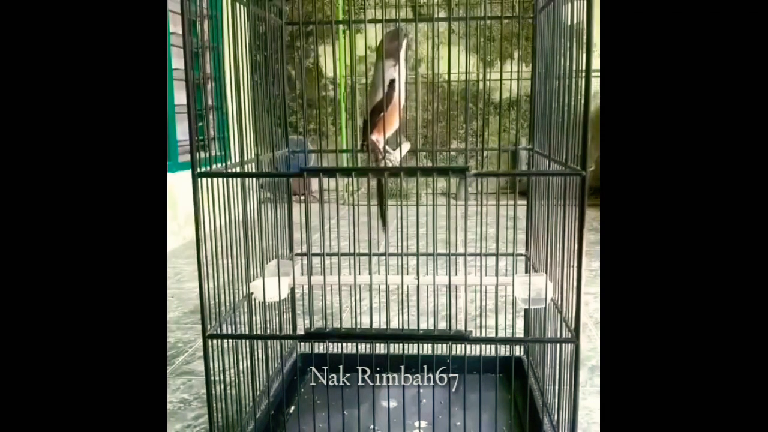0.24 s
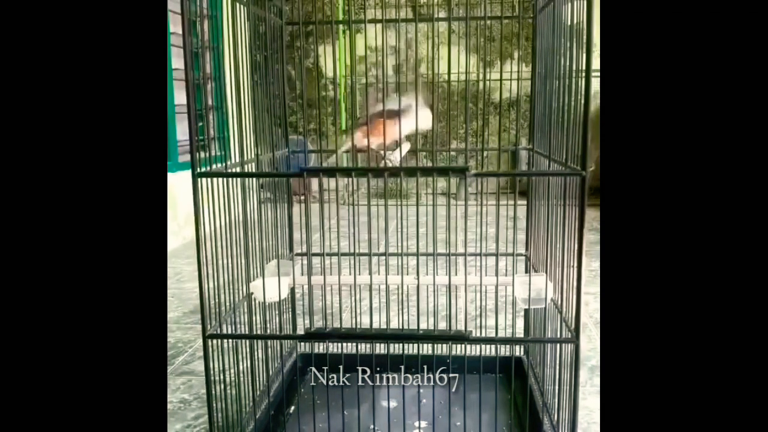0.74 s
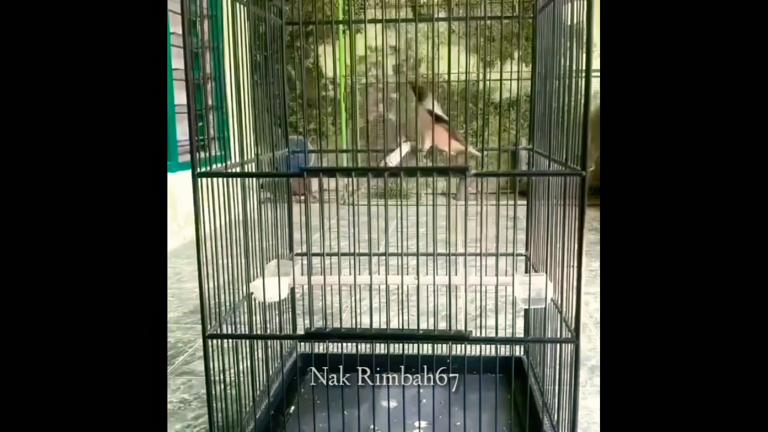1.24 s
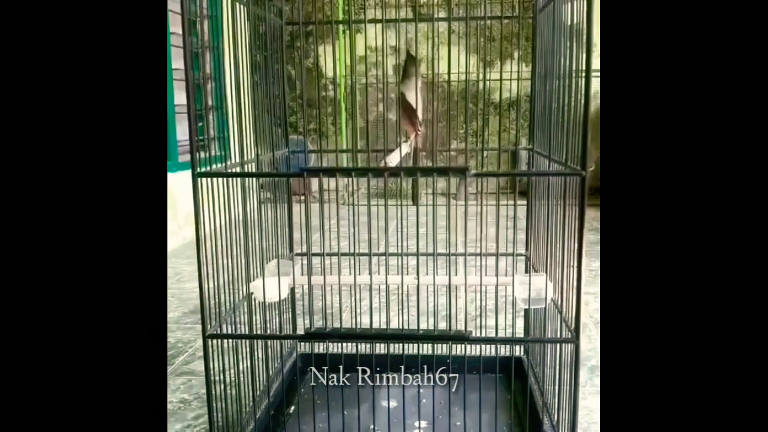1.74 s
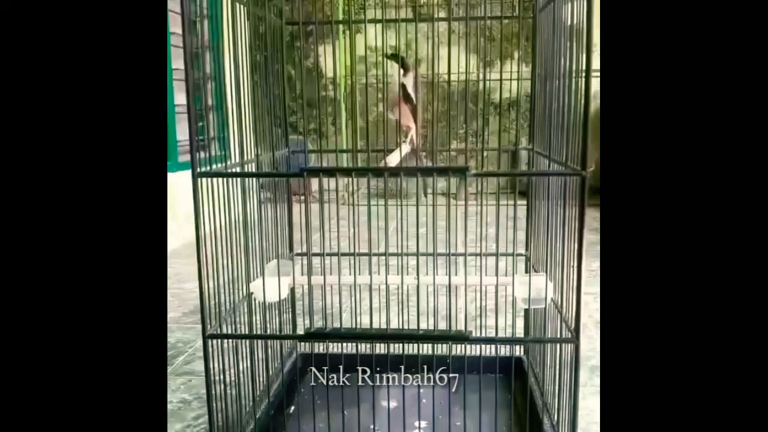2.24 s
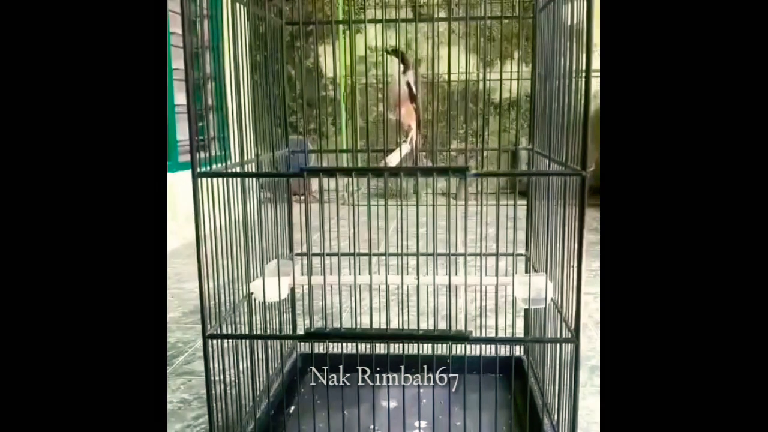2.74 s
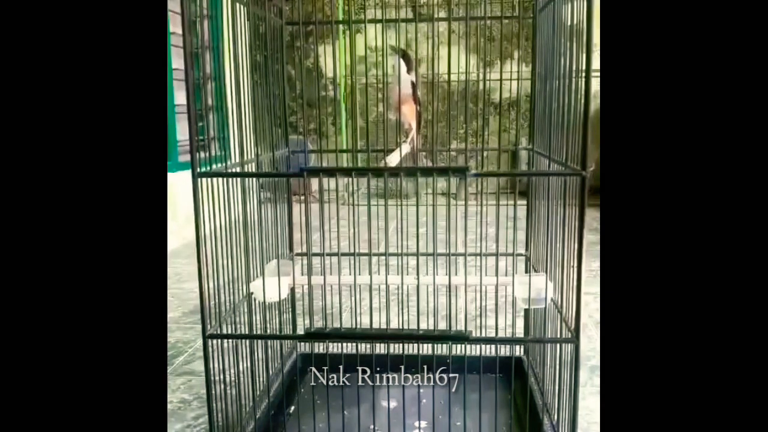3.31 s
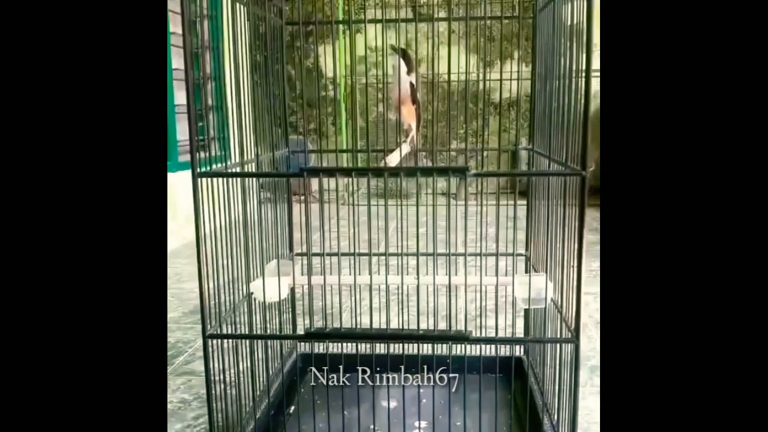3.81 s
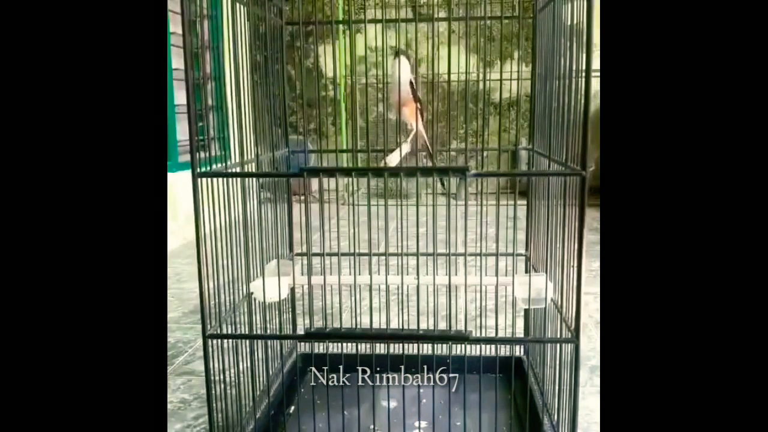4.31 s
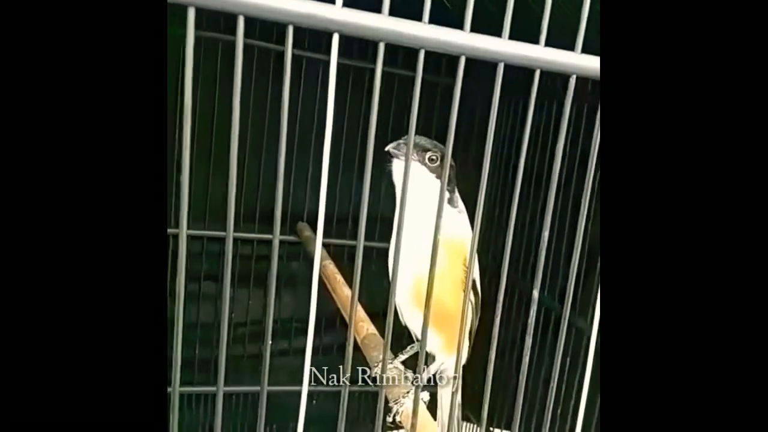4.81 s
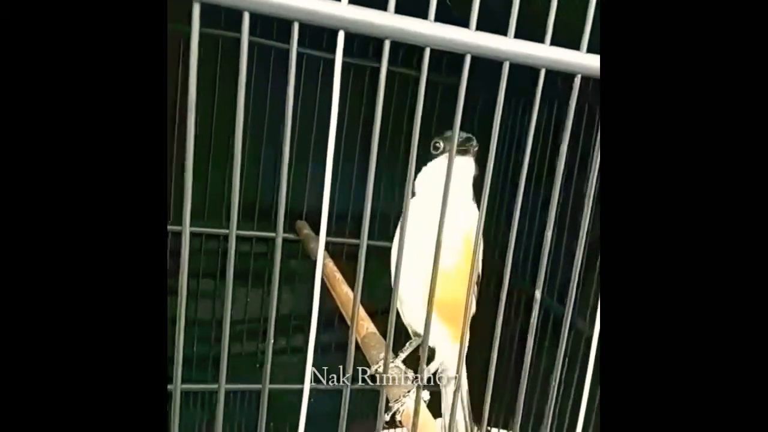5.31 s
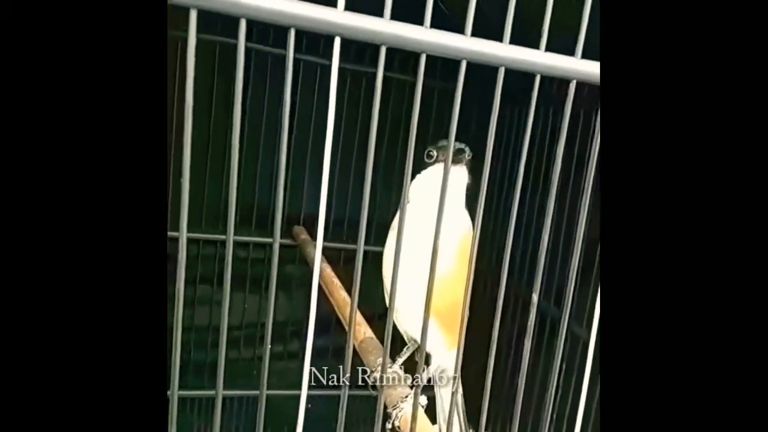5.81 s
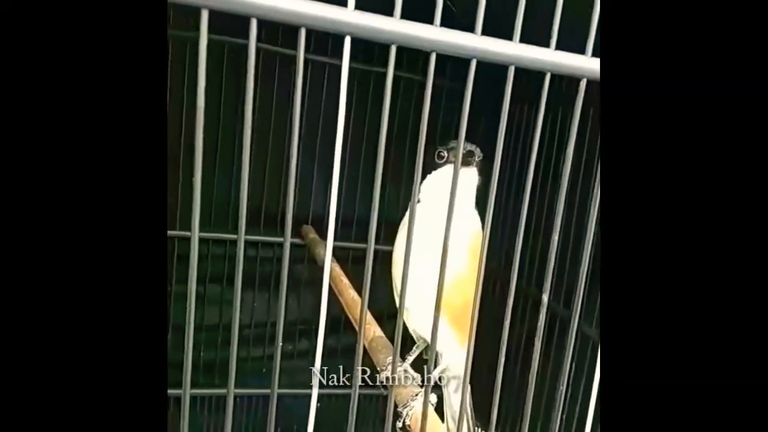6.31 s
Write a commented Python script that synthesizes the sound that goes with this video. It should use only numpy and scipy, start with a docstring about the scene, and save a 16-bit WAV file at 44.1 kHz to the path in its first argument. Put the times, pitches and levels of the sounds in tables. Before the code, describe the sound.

From 0 s a caged bird sings in a hard-walled porch, its voice wrapped in about half a second of bright reverberation. Two short nasal buzzes lead to a high double whistle at 0.13 s, a falling slur and a raspy stroke near 0.5 s. Sparse harsh chirps follow from 1.1 to 1.8 s, then quieter buzzes and low mews around 2.1-2.8 s. From 2.9 s it quickens: chirps, mews and rasps, then loud sliding whistles at 3.25-3.35, 3.65-3.8 and 4.0-4.13 s. Faint traffic swells near 3 s; a low engine passes softly, strongest around 2 s. At 4.4 s everything cuts, then fades in quickly, closer and drier, slightly left. A rising rasp at 4.65 s and separate sharp chips at 5.04-5.45 s precede a harsh falling note at 5.53 s, then six scolds from 5.69 s, about 0.17 s apart, over dull rush and intermittent low hums.

```python
"""A caged shrike sings in a hard-walled porch: short whistles, slurs and rasps smear into the walls' answer,
over far traffic and a passing engine. The sound cuts off, then quickly fades in from close by, the bird to
one side: a rising rasp, chips and harsh scolds, over a duller rush and low hums that come and go.
The voice is a trembling membrane's partials through a throat, plus rasping air; walls are decaying noise
and the traffic is shaped noise."""
import sys
import numpy as np
from scipy import signal
from scipy.fft import rfft, irfft, next_fast_len
from scipy.io import wavfile
from scipy.ndimage import uniform_filter1d, minimum_filter1d, map_coordinates

SR = 44100
rng = np.random.default_rng(int(sys.argv[2]) if len(sys.argv) > 2 else 0)


def dump_mix(stems):
    """Bounce the given channels to the path in sys.argv[1] as a 16-bit WAV at rate SR."""
    frames = np.atleast_2d(stems).T  # one column per channel
    limited = np.clip(frames, -1, 1)  # hard clip at full scale
    pcm = np.round(limited * 32767).astype(np.int16)
    wavfile.write(sys.argv[1], SR, pcm)


N = 288855

# A voice, wherever a table holds one: throat_hz, fall_db_per_octave (either side of the throat),
# odd_partials_db, rasp_db, roughness_db. Levels of notes are ahead of the mix.
# A kind of note: a voice with throat_over_pitch in place of throat_hz, then a shape: peak_share (of the
# length), arch_factor (pitch at the peak), start_db, end_db (both relative to the peak).


def amp(db):
    """dB to gain."""
    return 10 ** (np.asarray(db) / 20)


def unit(x):
    """x at rms 1."""
    return x / np.sqrt(np.mean(x ** 2) + 1e-20)


def along(points, hz):
    """Reads (Hz, value) points on a log frequency axis."""
    point_hz, value = np.transpose(points)
    return np.interp(np.log(hz + 1), np.log(point_hz + 1), value)


def curves(rows, t):
    """One value per time for each column after the time."""
    s, *columns = np.transpose(rows)
    return [np.interp(t, s, column) for column in columns]


def wobble(rate, size=N):
    """A smooth random curve, rate knots a second."""
    return map_coordinates(rng.standard_normal(int(size * rate / SR) + 4), [np.arange(size) * rate / SR])


def tremor(size, spacing):
    """A random curve of size samples with a knot every spacing samples."""
    return map_coordinates(rng.standard_normal(1500), [np.arange(size) / spacing])


def filtered(x, response):
    """x shaped by a response over frequency."""
    m = next_fast_len(N + SR // 2)
    return irfft(rfft(x, m) * response(np.fft.rfftfreq(m, 1 / SR)), m)[..., :N]


def edges(t, start, end, rise, fall):
    """A gate with soft ends."""
    ramp = np.clip(np.minimum((t - start) / rise, (end - t) / fall), 0, 1)
    return np.sin(np.pi / 2 * ramp) ** 2


def sing(notes, rasp, beak_db):
    """Each note: partials of a trembling membrane through the throat, plus rasping air."""
    # high partials that bypass the throat: freq_hz, level_db (relative)
    beak = [(3000, -42), (6000, -47.5), (9000, -22), (10500, -43.5), (12300, -19.5), (14000, -39.5)]
    air = unit(filtered(rng.standard_normal(N), lambda hz: amp(along(rasp, hz))))
    out = np.zeros(N)
    for (throat_hz, fall_db, odd_db, rasp_db, rough_db), rows in notes:
        start, end = rows[0][0] - .002, rows[-1][0] + .005
        i = np.arange(max(int(start * SR), 0), min(int(end * SR), N))
        t = i / SR
        hz, db = curves(rows, t)
        hz = uniform_filter1d(hz, size=90)

        # rougher notes pulse deeper, about every 5 ms
        depth = np.clip(.15 * np.abs(rough_db), 0, .8)
        beat = depth * np.cos(2 * np.pi * 195 * (t - start - .004))
        # slow throbs and a fast grain that spreads each line
        grain = np.tanh(tremor(len(i), 128.7) + 0.42 * tremor(len(i), 30))
        throb = unit(amp(rough_db * (grain + beat)))
        waver = 1 + .007 * np.abs(rough_db) * tremor(len(i), 45)

        k = np.arange(1, 16)[:, None]  # partial numbers
        octaves = np.log2(k * hz / throat_hz)
        slope = np.where(octaves > 0, -fall_db, fall_db)
        throat = amp(slope * octaves + odd_db * (k % 2))
        throat /= np.sqrt(np.sum(throat ** 2, axis=0) / 2)
        bypass = amp(beak_db + along(beak, k * hz)) * (octaves > .3)
        partials = (throat + bypass) * (k * hz < SR / 3)
        phase = 2 * np.pi * np.cumsum(hz * waver) / SR
        tone = np.sum(partials * np.sin(k * phase + k * k), axis=0)
        gate = edges(t, start, end, .0025, .005)
        out[i] += amp(db) * gate * (throb * tone + amp(rasp_db) * air[i])
    return out


def note(voice, shape, s, length, from_hz, to_hz, db):
    """A glide by way of one peak; the throat follows the pitch at the peak."""
    # a share over 1 puts the peak past the end: the glide heads for it, then steps to the end values
    share, arch, start_db, end_db = shape
    peak_hz = arch * (from_hz + share * (to_hz - from_hz))
    rows = [(s, from_hz, db + start_db), (s + share * length, peak_hz, db), (s + length, to_hz, db + end_db)]
    return (voice[0] * peak_hz, *voice[1:]), rows


def whistles():
    """Thin notes: the throat sits near the pitch and lets little but the first partial out."""
    # the kind of note: voice, shape
    kind = (1.17, 19.5, 2, -21, 1.5), (0.37, 1, -7.5, -11)
    # often two at once: start_s, length_s, from_hz, to_hz, level_db
    whistle_rows = [(0.134, 0.11, 6640, 6660, -18), (0.141, 0.091, 5624, 5260, -19),
                    (0.144, 0.11, 7500, 8200, -38), (0.723, 0.075, 5960, 6200, -37.5),
                    (1.29, 0.014, 2300, 2500, -36.5), (1.433, 0.028, 2800, 3540, -37.5),
                    (1.548, 0.024, 2750, 4040, -29.5), (2.833, 0.029, 6280, 7470, -32.5),
                    (3.662, .06, 5400, 5700, -41)]
    return [note(*kind, *row) for row in whistle_rows]


def mews():
    """Low falling mews, each with its own steepness of throat."""
    # the kind of note: voice, shape
    kind = (1.16, -0.5, -3.5, -20.5, 2.5), (1.1, 1.19, -8.5, -4.5)
    # start_s, length_s, from_hz, to_hz, level_db, added_fall_db_per_octave
    mew_rows = [(2.327, 0.034, 1600, 1238, -33, 23), (3.043, 0.044, 1750, 1177, -22.5, 10),
                (3.465, 0.046, 2360, 1397, -24, 23.5), (4.255, 0.061, 2370, 1403, -28.5, 24.5)]
    voice, shape = kind
    return [note(np.add(voice, [0, fall_db, 0, 0, 0]), shape, *row) for *row, fall_db in mew_rows]


def drops():
    """Fast falling strokes, each with its own share of rasping air."""
    # the kind of note: voice, shape
    kind = (1.3547, 19, 7, 2.5, 5), (.4, 1.17, -8.5, -2.5)
    # start_s, length_s, from_hz, to_hz, level_db, added_rasp_db
    drop_rows = [(0.522, .032, 4160, 2665, -18, -3.5), (3.023, 0.035, 5960, 4960, -23.5, -14.5),
                 (3.134, 0.028, 6150, 4400, -24, -1.5), (4.358, 0.047, 6090, 3210, -33.5, 4)]
    voice, shape = kind
    return [note(np.add(voice, [0, 0, 0, rasp_db, 0]), shape, *row) for *row, rasp_db in drop_rows]


def chirps():
    """Harsh chirps led by the second partial: the throat sits an octave up, odd partials are weak."""
    # the kind of note: voice, shape
    kind = (1.98, 25, 4, 0.5, 5.5), (0.46, 1.12, -5, -13)
    # start_s, length_s, from_hz, to_hz, level_db, added_odd_partials_db, added_rasp_db
    chirp_rows = [(1.305, 0.029, 2050, 3190, -19.5, -17, -16.5), (1.446, 0.02, 3200, 2264, -24, -24, -13),
                  (1.562, 0.022, 2300, 2940, -19.5, -34, -13.5),
                  (1.758, 0.027, 2900, 2150, -22.5, -48, -15), (2.53, .035, 2600, 2360, -43, -28.5, 6.5),
                  (2.915, 0.03, 2500, 3255, -21.5, -48.5, -3)]
    voice, shape = kind
    return [note(np.add(voice, [0, 0, odd_db, rasp_db, 0]), shape, *row)
            for *row, odd_db, rasp_db in chirp_rows]


def buzzes():
    """Nasal buzzes rich in partials: the throat sits well above the pitch."""
    # the kind of note: voice, shape
    kind = (1, 16, -1.5, -11.5, 4.5), (0.52, 0.99, -5, -12)
    # start_s, length_s, from_hz, to_hz, level_db, throat_over_pitch (replaces the kind's own)
    buzz_rows = [(0, 0.013, 2196, 2200, -23, 2.74), (0.03, 0.012, 2209, 2328, -16, 2.45),
                 (1.116, .029, 3013, 2300, -22, 1.65), (2.095, .04, 1143, 1358, -31.5, 1.31),
                 (2.315, 0.18, 2018, 2103, -44, 2.1)]
    voice, shape = kind
    return [note((over, *voice[1:]), shape, *row) for *row, over in buzz_rows]


def chips():
    """Close-up chips: each bends and rasps by its own amount."""
    # the kind of note: voice, shape
    kind = ((1.01, 28, 10, 0, 5), (.25, 1, -7, -12))
    # start_s, length_s, from_hz, to_hz, level_db, arch_factor, added_rasp_db
    chip_rows = [(4.67, 0.028, 2174, 2160, -34, 0.99, -30), (4.68, 0.031, 3250, 3530, -18.5, 1.04, -10),
                 (4.747, 0.021, 7250, 7230, -13.5, 0.86, -44), (5.043, 0.022, 2816, 2815, -17, 1.15, -35),
                 (5.063, 0.014, 2613, 2070, -27, 0.9, -19), (5.137, .02, 3494, 2960, -15.5, 1.02, -32),
                 (5.229, .018, 3430, 3700, -16, 1.166, -15.5), (5.314, 0.015, 3835, 4190, -13, 1.17, -13.5),
                 (5.385, .018, 4550, 6500, -24, 1.3, -15), (5.454, 0.014, 6840, 6710, -18.5, 1.01, -43)]
    voice, shape = kind
    return [note(np.add(voice, [0, 0, 0, rasp_db, 0]), np.multiply(shape, [1, arch, 1, 1]), *row)
            for *row, arch, rasp_db in chip_rows]


def scolds():
    """The same rising tick and falling bark, each time with its own level, pitch and length."""
    # rising tick: voice, then rows of after_start_s, pitch_hz, level_db (both scaled per scold)
    tick = ((1695, 17.5, 22, -6.5, 5), [(0, 773, -33), (.005, 1492, -22.5), (.011, 2250, -19)])
    # falling bark: the same columns
    bark = ((4393, 50.5, 26.5, -9, 5.5), [(.004, 4300, -23.5), (.008, 5290, -10), (.014, 4580, -4),
            (.021, 4178, 3), (.03, 3498, -8.5), (.04, 2690, -20.5)])
    # start_s, added_level_db, pitch_factor, length_factor
    scold_rows = [(5.687, -11.5, 1.015, 0.98), (5.867, -11.5, 1.006, 0.96), (6.034, -13.5, 0.99, 0.92),
                  (6.191, -14, 0.93, 0.95), (6.373, -14.5, .99, .99), (6.531, -13.5, 0.98, 0.93)]
    return [(voice, [(s + stretch * dt, factor * hz, level_db + db) for dt, hz, db in rows])
            for s, level_db, factor, stretch in scold_rows for voice, rows in (tick, bark)]


def far_bird():
    """The song from afar: long slurs and short notes."""
    # long slurs: voice, then rows of time_s, pitch_hz, level_db
    slurs = [ ((5500, 11, -2, -13.5, 1.7), [(.268, 6340, -17), (.29, 5900, -23), (.3, 4890, -19.5),
             (.322, 2780, -34)]), ((4397, 12, -3.5, -7, -0.2), [(.41, 1591, -29), (.44, 1900, -23.5),
             (.465, 2370, -19.5), (.49, 2960, -28.5)]), ((5597.5, 7.5, -15, -41.5, 2), [(3.333, 2765, -9.5),
             (3.345, 2690, -9), (3.365, 2610, -35)]), ((3104, 37.5, 4.5, -19, 4), [(.724, 1186, -26.5),
             (.745, 1219, -22.5), (.77, 1226, -27), (.8, 1258, -21.5), (.825, 1152, -27.5)]),
             ((1679.5, 19, -0.5, -29.5, 1.27), [(2.613, 888, -35), (2.64, 1053, -33.5), (2.71, 1116, -31),
             (2.735, 1133, -25), (2.795, 1120, -24.5), (2.825, 1042, -36.5)]),
             ((6005.5, 6.5, 10.5, -36.5, 1), [(3.25, 5180, -24.5), (3.285, 5746, -9), (3.318, 6870, -14.5),
             (3.335, 5570, -10.5)]), ((6506.5, 19.5, -3, -8.5, 0.5), [(3.645, 2317, -28.5),
             (3.658, 2815, -13.5), (3.675, 3450, -10.5), (3.745, 3650, -42)]),
             ((4289.5, 19.5, -2.5, -17, 0.5), [(3.735, 4374, -22.5), (3.77, 4588, -9.5), (3.79, 4120, -10),
             (3.82, 3963, -18.5)]), ((5492, 19.5, -32, -18, .8), [(3.995, 2260, -31), (4.04, 2747, -13),
             (4.08, 3030, -17.5)]), ((5401, 18, -18.5, -24, 1.5), [(4.082, 2950, -16.5),
             (4.105, 2507, -6.5), (4.135, 2320, -25)]), ]
    # breath past the syrinx, beak facing the listener: freq_hz, level_db per Hz (relative)
    far_rasp = [(500, -17.5), (1500, -16.5), (3000, -6), (5000, 3.5), (7000, -34.5), (9000, -14),
                (10500, -19.5), (12300, -12), (13500, 2)]
    short_notes = whistles() + mews() + drops() + chirps() + buzzes()
    return sing(slurs + short_notes, far_rasp, beak_db=3.0)


def near_bird():
    """The song close up: slurs, chips and scolds."""
    # slurs: voice, then rows of time_s, pitch_hz, level_db
    slurs = [ ((3586, 33, 14.5, -18.5, 4.5), [(4.62, 3330, -43), (4.665, 3326, -25.5), (4.69, 3874, -19),
             (4.725, 4910, -21.5), (4.778, 4580, -44.5)]), ((6512, 9.5, -3.5, -7.5, 7),
             [(4.675, 5830, -48.5), (4.715, 7180, -19), (4.745, 5850, -24.5), (4.778, 5390, -50)]),
             ((4490, 22.5, 29, -9.5, 3.5), [(5.529, 5370, -35.5), (5.539, 4750, -15), (5.547, 4280, -12.5),
             (5.555, 3490, -27.5), (5.565, 2690, -34.5)]), ]
    # breath past the syrinx, beak turned aside: freq_hz, level_db per Hz (relative)
    near_rasp = [(500, -21.5), (1500, -25.5), (3000, 2.5), (5000, -2), (7000, -8.5), (9000, -9.5),
                 (11500, -17.5), (12600, -44), (13500, -44)]
    return sing(slurs + chips() + scolds(), near_rasp, beak_db=-26.0)


def walls(x, decay, build, side_db):
    """A diffuse answer that builds up, then dies band by band; side_db sets its width by frequency."""
    hz, t, z = signal.stft(rng.standard_normal((2, SR)), SR, nperseg=256)
    t60 = np.maximum(along(decay, hz), .02)[:, None]
    tail = signal.istft(z * amp(-60 * t / t60), SR, nperseg=256)[1]
    tail *= 1 - np.exp(-np.arange(tail.shape[1]) / SR / build)
    tail /= np.linalg.norm(tail[0])
    mid, side = signal.fftconvolve(x[None], tail, axes=1)[:, :N]
    side = filtered(side, lambda f: amp(along(side_db, f)))
    return np.array([mid + side, mid - side])


def porch_walls(bird):
    """The porch's answer: nearly mono in the lows, wider toward the top."""
    # decay of the porch: freq_hz, t60_s
    porch = [(1000, 0.37), (3000, 0.45), (6000, 0.38), (12000, 0.27)]
    return walls(bird, porch, 0.00067, [(1500, -71), (4500, -31), (12000, -8)])


def close_walls(bird):
    """A short answer from beside the cage and a fainter, longer, slower-building one from farther off."""
    # walls beside the cage: freq_hz, t60_s
    nook = [(1000, 0.12), (4000, 0.054), (12000, 0.086)]
    # farther walls: freq_hz, t60_s
    yard = [(1000, 0.78), (4000, 0.27), (12000, .3)]
    beside = walls(bird, nook, 0.001, [(1000, 2.06)])
    farther = walls(bird, yard, .02, [(1000, 1)])
    return amp(-11.5) * beside + amp(-34.0) * farther


def hum(rows, orders):
    """Unsteady low tones tied to one speed; rows give the pitch of the first order listed."""
    t = np.arange(N) / SR
    hz, db = curves(rows, t)
    turn = 2 * np.pi * np.cumsum(hz / orders[0][0]) / SR
    tones = sum(amp(level_db + 3.8 * wobble(7.3)) * np.sin(k * turn + 0.4 * wobble(17))
                for k, level_db in orders)
    return amp(db + 2.5) * edges(t, rows[0][0], rows[-1][0] + 0.033, 0.032, 0.068) * tones


def engine():
    """A passing engine: several orders of one turning speed swell and fade."""
    # second order of the engine: time_s, pitch_hz, level_db (relative)
    pass_rows = [(.4, 101, -65), (2.1, 101.9, -55.5), (3.4, 99.8, -61)]
    # order, level_db (relative)
    order_rows = [(2, -3), (3, -2.5), (4, -4), (5, -8), (6, -7.5)]
    return hum(pass_rows, order_rows)


def low_hums():
    """Low gliding tones that come and go, strongest midway."""
    # start_s, length_s, from_hz, to_hz, level_db (relative)
    hum_rows = [(4.94, 0.59, 108, 111.4, -49.5), (5.717, 0.33, 118, 119, -53),
                (6.18, 0.48, 60.2, 63.1, -48.5), (5.325, 0.23, 192, 199, -54),
                (5.692, .25, 212.6, 200, -55), (6.155, 0.27, 198.7, 215, -54.5)]
    edge_db = -3  # start and end, relative to the middle
    total = 0
    for s, length, from_hz, to_hz, db in hum_rows:
        middle = (s + length / 2, (from_hz + to_hz) / 2, db)
        rows = [(s, from_hz, db + edge_db), middle, (s + length, to_hz, db + edge_db)]
        total = total + hum(rows, [(1, 0.0077)])
    return total


def rush(spectrum, alike, patchy_db):
    """Stereo noise of rms 1 with patches of random gain."""
    z = signal.stft(rng.standard_normal((2, N)), nperseg=512)[2]
    field = uniform_filter1d(rng.standard_normal(z.shape[1:]), 6, 0)
    field = uniform_filter1d(field, 14, 1)
    pair = signal.istft(z * amp(patchy_db * unit(field)), nperseg=512)[1][:, :N]

    def response(hz):
        # more side against mid where left and right are less alike
        angle = np.arccos(np.clip(along(alike, hz), -1, 1)) / 2
        return amp(along(spectrum, hz)) * [np.cos(angle), np.sin(angle)]

    mid, side = filtered(pair, response)
    return unit(np.array([mid + side, mid - side]))


def far_road():
    """Far traffic as a rush of shaped noise whose level drifts."""
    # time_s, level_db
    road_rows = [(0, -56), (1.2, -57), (3.14, -50), (4.4, -56)]
    # spectrum: freq_hz, level_db per Hz (relative)
    far_air = [(15, -46), (40, -18), (70, -4), (160, -1.5), (350, -9), (800, -13.5), (1500, -19),
               (3000, -23.5), (6000, -20.5), (9000, -29.5), (13000, -29)]
    likeness = [(1500, 1.0), (5000, .9), (12000, 0.54)]  # freq_hz, left_right_likeness
    level = amp(curves(road_rows, np.arange(N) / SR)[0])
    return level * rush(far_air, likeness, patchy_db=-1.5)


def near_road():
    """The steady rush behind the close bird, wider between left and right."""
    # spectrum: freq_hz, level_db per Hz (relative)
    near_air = [(10, -7), (25, -1.5), (100, -8), (240, -15.5), (500, -23.5), (1500, -28.5), (3000, -39.5),
                (4500, -33), (7000, -44.5), (8500, -52.5), (13000, -52.5)]
    # freq_hz, left_right_likeness
    likeness = [(60, 0.89), (170, 1), (500, 0.65), (1500, 1), (8000, 0.32)]
    return amp(-48) * rush(near_air, likeness, patchy_db=2.5)


def far_view():
    """The walls outweigh the bird's direct sound; left and right hear nearly the same bird."""
    cut_s = 4.406
    t = np.arange(N) / SR
    bird = far_bird()
    heard = amp(-5.5) * bird + amp(1.0) * porch_walls(bird) + far_road() + engine()
    return heard * edges(t, -1, cut_s + .001, .01, .003)


def near_view():
    """Close up: the direct sound leads, later but louder on the left."""
    return_s, fade_s, lag_samples = 4.459, .2, 8
    t = np.arange(N) / SR
    bird = near_bird()
    heard = (bird + close_walls(bird)) * amp([[3.5], [2]])
    heard[0] = np.roll(heard[0], lag_samples)
    # the ramp starts a quarter of the way up
    ramp = np.clip(0.25 + (t - return_s) / fade_s, 0, 1)
    fade = (t > return_s) * ramp ** 2.55
    return (heard + near_road() + low_hums()) * fade


def scene():
    """The far view, then the near one."""
    return far_view() + near_view()


def record(dry):
    """A quick look-ahead limiter holds peaks under full scale; nothing is kept above the band limit."""
    limit_s, top_hz = .003, 13200
    size = int(limit_s * SR)
    needed = np.minimum(1, .97 / (np.abs(dry).max(axis=0) + 1e-9))
    gain = uniform_filter1d(minimum_filter1d(needed, size=2 * size + 1), size=size)
    return filtered(dry * gain, lambda hz: np.clip((top_hz - hz) / 250, 0, 1))


dry = scene()
out = record(dry)
dump_mix(out)
```